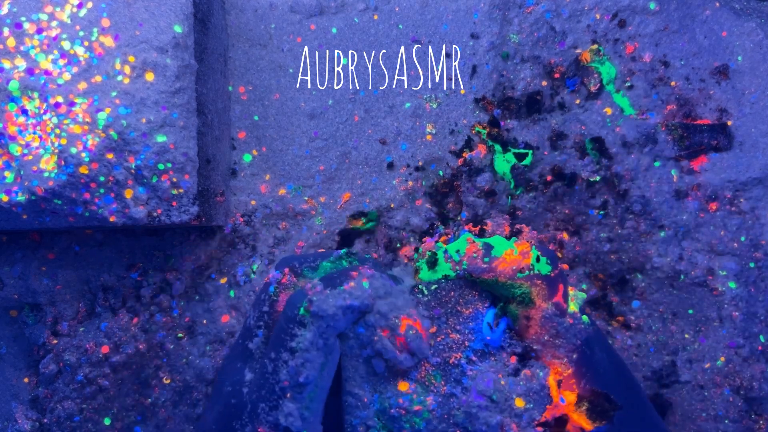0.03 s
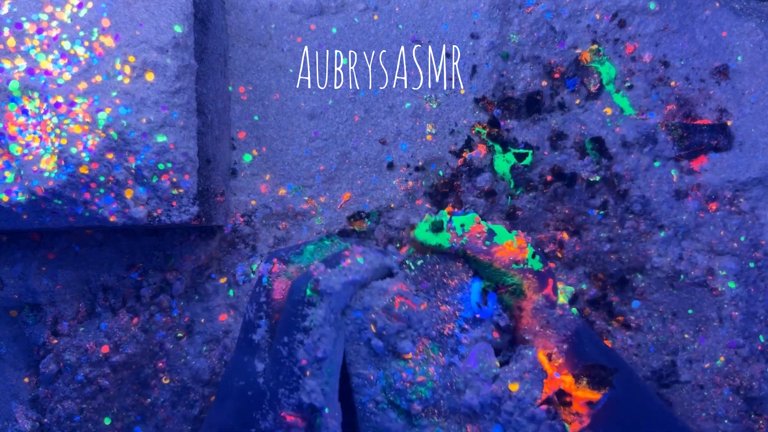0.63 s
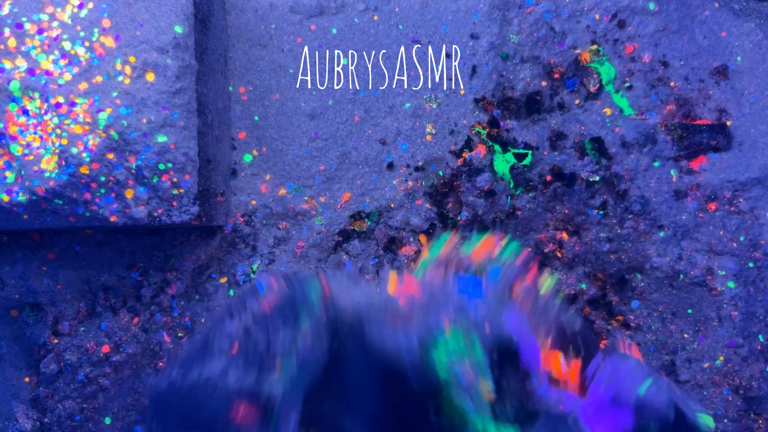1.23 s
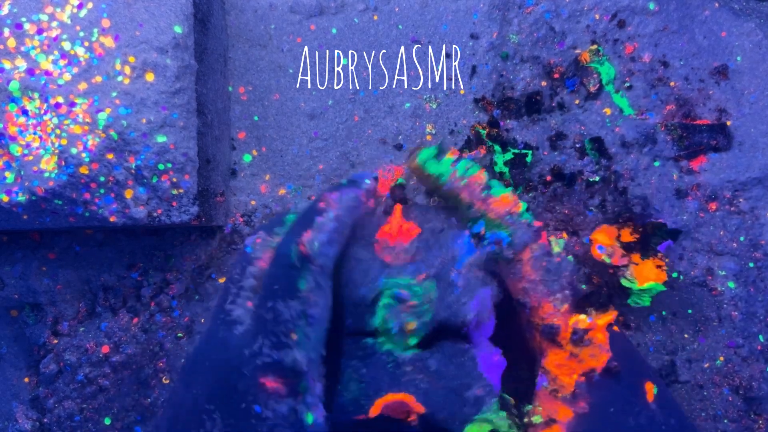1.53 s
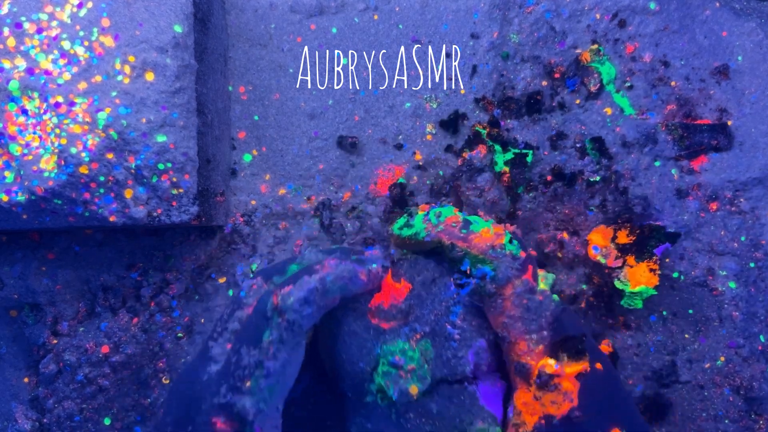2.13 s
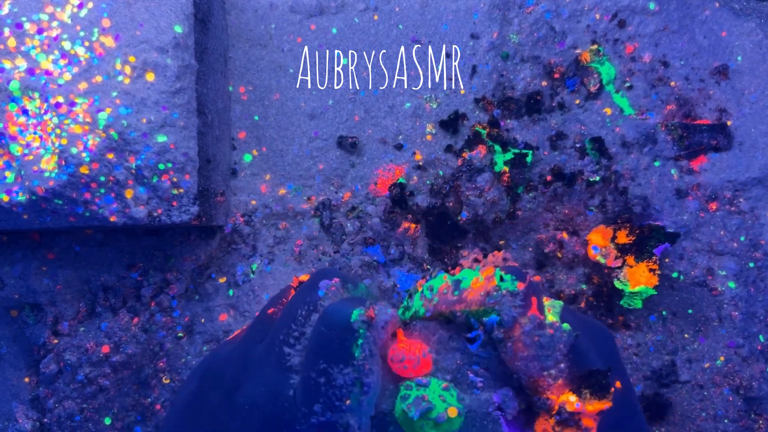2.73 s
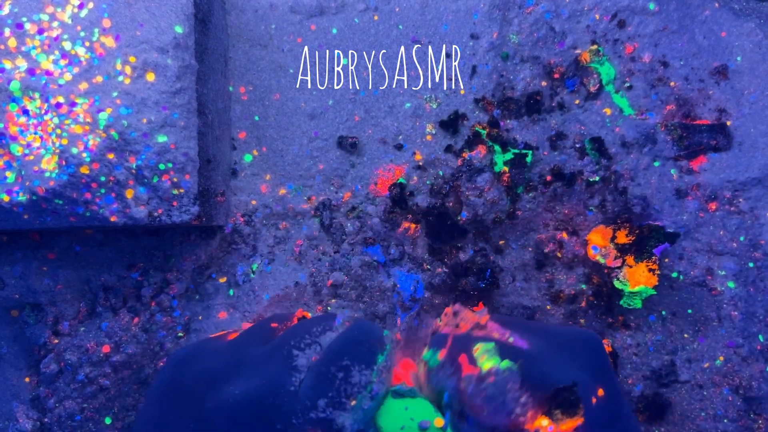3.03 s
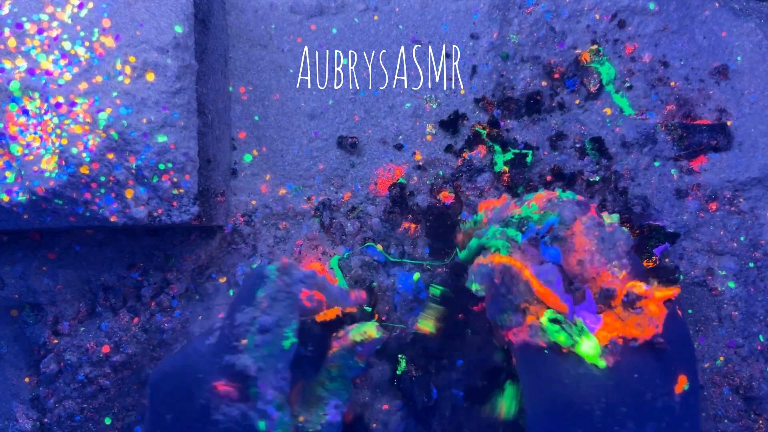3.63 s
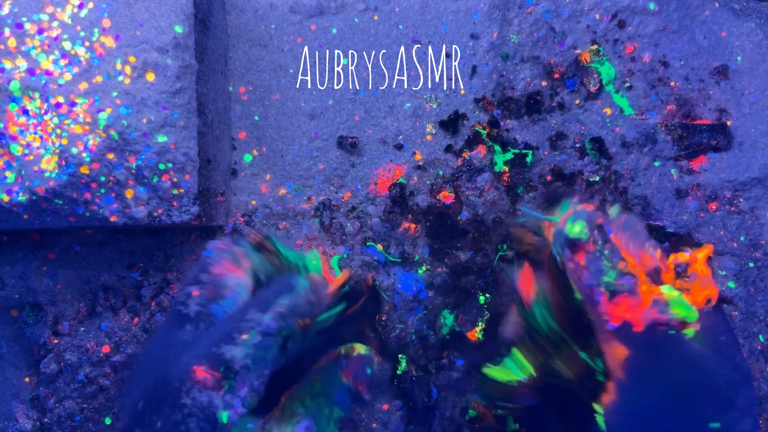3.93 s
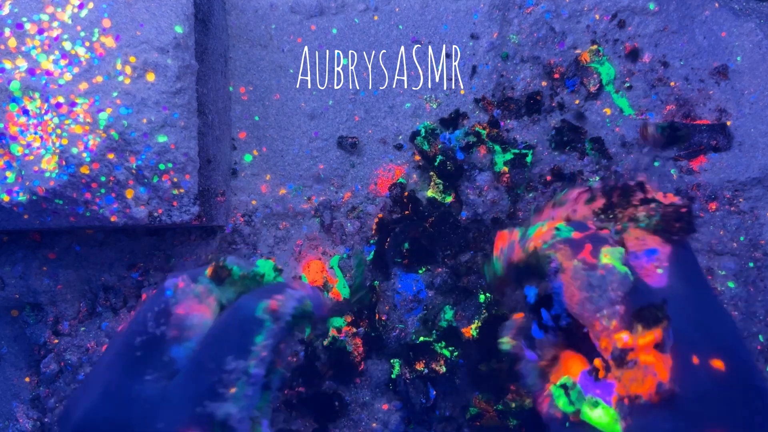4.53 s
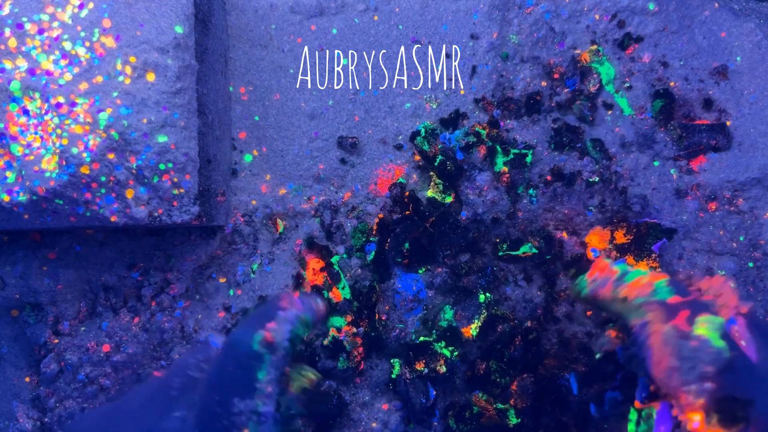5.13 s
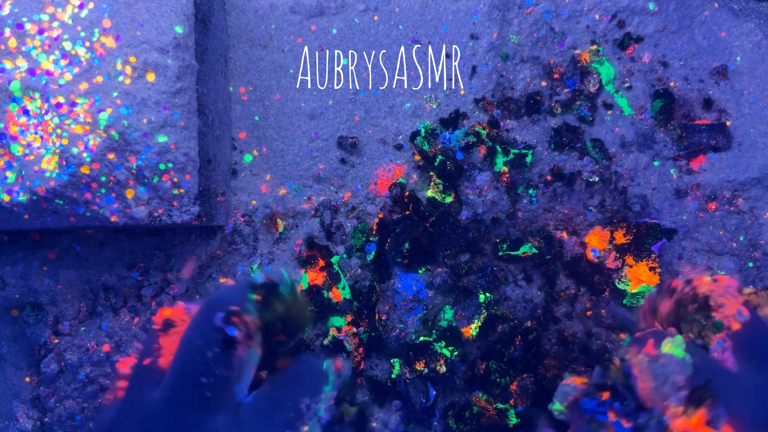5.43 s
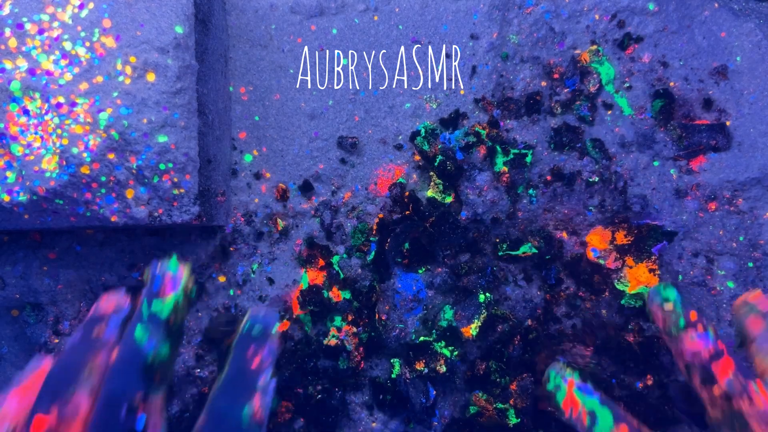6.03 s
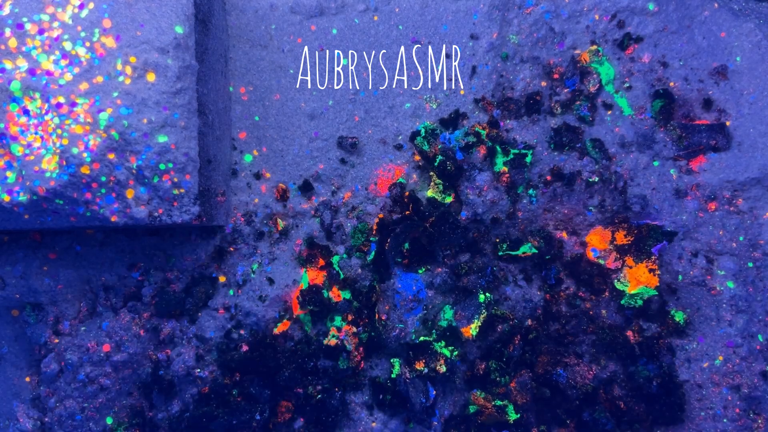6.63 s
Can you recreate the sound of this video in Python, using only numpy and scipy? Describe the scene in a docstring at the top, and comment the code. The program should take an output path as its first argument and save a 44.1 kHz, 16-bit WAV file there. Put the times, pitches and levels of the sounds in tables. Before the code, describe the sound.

Hands crush dry, brittle foam up close with crisp crunches and a soft table thud, then rub the powder in fading strokes.

```python
"""Hands crush a lump of dry floral foam over a table, close to a stereo microphone.
Countless tiny cell walls break in each squeeze, ringing in the cupped palms, and brittle flakes snap.
After a second the lump collapses: the hands thud on the table and hard bits knock against it.
More squeezes follow; from about 3.4 s the open hands rub the powder in softer and softer strokes.
Near 6 s they withdraw, leaving a few ticks and light bumps in a quiet room."""
import sys
import numpy as np
from scipy import signal
from scipy.fft import rfft, irfft, next_fast_len
from scipy.io import wavfile
from scipy.ndimage import uniform_filter1d

SR = 44100
rng = np.random.default_rng(int(sys.argv[2]) if len(sys.argv) > 2 else 0)


def dump(signal):
    """Clip the signal to [-1, 1] and save it as 16-bit WAV at the path in sys.argv[1]."""
    limited = np.clip(np.atleast_2d(signal).T, -1, 1)
    pcm = np.round(limited * 32767).astype(np.int16)
    wavfile.write(sys.argv[1], SR, pcm)


N = 303849
TIME = np.arange(N) / SR

# The brittle tone of a breaking flake. Each row: frequency in Hz, gain in dB.
FLAKE_EQ = [(100, -28.5), (400, -9.5), (750, -1.5), (2000, -1), (3400, 4), (6000, -3), (10000, 4.5),
            (12500, -16), (15500, -35.5)]
# The hollow ring between the palms: about 1580 Hz for a light grip, 890 Hz for a firm one (over -50 dB).
# Each row: effort in dB, mid-stroke pitch in Hz.
POCKET_PITCH = [(-41.5, 1580), (-50, 890)]


def crumbling(level_db=1.0, grit_db=-11.0, grit_growth=0.06, gaps_db=3.0, slips_db=2.0, ring_octaves=0.46):
    """Cell walls break in a dense stream; harder squeezing adds coarse grit, and the cupped hands ring."""
    # The dry tone of the foam. Each row: frequency in Hz, gain in dB.
    foam_eq = [(60, -19), (200, -13), (450, -11.5), (650, -3.5), (1150, -5), (1550, -2), (1770, -3.5),
               (2050, -1.5), (2400, -3.5), (3000, 0.5), (6000, -1), (9300, 2), (12000, -2), (15000, -20.5)]
    # Where the hollow body and the fine fizz act. Each row: frequency in Hz, signed weight on their dB.
    body_weights = [(200, 0.84), (600, 1), (1400, 0.96), (2800, 0)]
    fizz_weights = [(1500, -0.15), (3000, -2), (6000, -0.53), (10000, 0.91)]
    control_t = TIME[::128]
    effort_db, *tone = hands(control_t)
    effort_db = np.interp(TIME, control_t, effort_db)
    powder = unit(fractures(N, per_s=9000, spread_db=2.0))
    grit = unit(fractures(N, per_s=180, spread_db=3.5))
    stream = powder + grit * amp(grit_db + grit_growth * (effort_db - effort_db.mean()))
    hz, t, spectrum = signal.stft(unit(colour(stream, foam_eq)), SR, nperseg=512, noverlap=384)
    body_db, fizz_db, ring_db, pocket_hz = (np.interp(t, control_t, curve) for curve in tone)
    eq_db = np.outer(read(body_weights, hz), body_db) + np.outer(read(fizz_weights, hz), fizz_db)
    eq_db += ring_db * np.exp(-(np.log2((hz[:, None] + 1) / pocket_hz) / ring_octaves) ** 2)
    eq_db += gaps_db * patches(spectrum.shape, frames=26, bins=3)  # finger gaps open and shut
    eq_db += slips_db * patches((1, len(t)), frames=4, bins=1)  # the grip slips
    shaped = signal.istft(spectrum * amp(eq_db), SR, nperseg=512, noverlap=384)[1][:N]
    return shaped * amp(effort_db + level_db)


def hands(t, cupped_ring_db=7, open_ring_db=1):
    """All hand movements as one set of curves: their powers add, and the loudest leads the tone."""
    # Cupped hands squeeze the lump.
    # Each row: start, attack, hold and release in seconds, then effort, hollow body and fizz in dB.
    squeezes = [(-.026, 0.014, 0.031, 0.091, -33.5, -4.5, 0.8), (0.119, 0.081, 0.066, 0.17, -49, -2, -1.5),
                (0.321, 0.027, .012, 0.044, -49.5, -9, 2), (0.382, .049, 0.025, 0.035, -49.5, -1, -0.3),
                (0.471, 0.042, 0.17, 0.099, -46, -4, 0.5), (0.591, 0.052, 0.14, 0.11, -35.5, -3.5, 1.3),
                (.871, 0.05, 0.023, 0.097, -48, -8, 2), (0.957, 0.1, 0.0091, 0.069, -28, -3.5, -0.7),
                (1.686, 0.098, 0.12, 0.13, -52, -4, 1.5), (1.935, .097, 0.017, 0.15, -55, -1.5, 1),
                (2.121, 0.058, 0.0077, 0.047, -54.5, 7, -1), (2.156, 0.41, 0.28, 0.18, -38, -6.5, 3),
                (2.85, 0.046, .11, 0.12, -42, -3, 1), (3.084, .05, 0.04, .28, -55.5, -3.5, 0)]
    # Open hands rub off powder. Each row: as for a squeeze, without the fizz.
    rubs = [(3.39, 0.11, 0.11, 0.3, -41, -6.5), (3.883, 0.23, 0.096, 0.21, -45.5, -6),
            (4.298, 0.054, 0.1, 0.23, -58, -4.5), (4.471, 0.14, 0.034, 0.37, -49, -7.5),
            (4.941, 0.093, 0.2, .238, -52, -6.5), (5.436, 0.16, 0.19, 0.097, -54, -9.5)]
    # Dull scuffs on the table, and a spill of debris after the thud at 1.5 s.
    # Each row: start, hold and release in seconds, effort in dB.
    scuffs_and_spill = [(1.29, .05, 0.055, -57.5), (1.396, .03, 0.023, -61), (1.497, .005, .11, -52),
                        (6.655, 0.032, 0.091, -61)]
    # Loose powder trickles between strokes. Each row: time in seconds, level in dB.
    trickle = [(0, -60.5), (1.2, -55.5), (1.95, -62), (3.35, -74.5), (5.85, -72), (6.07, -80.5),
               (6.43, -69.5), (6.62, -77.5), (6.89, -69.5)]
    quick_attack_s, trickle_body_db, trickle_fizz_db = 0.0087, 6, 0.4
    moves = [stroke(t, *row, ring_db=cupped_ring_db) for row in squeezes]
    moves += [stroke(t, *row, fizz_db=0.84, ring_db=open_ring_db) for row in rubs]
    moves += [stroke(t, start, quick_attack_s, *row, body_db=8, fizz_db=-1, ring_db=open_ring_db)
              for start, *row in scuffs_and_spill]
    trickle_db = np.interp(t, *np.transpose(trickle))
    trickle_tone = trickle_body_db, trickle_fizz_db, open_ring_db, POCKET_PITCH[0][1]
    moves.append(np.broadcast_arrays(trickle_db, *trickle_tone))
    effort_db, *tone = np.swapaxes(moves, 0, 1)
    power = amp(effort_db) ** 2
    blended_tone = [np.average(curve, axis=0, weights=power) for curve in tone]
    return [10 * np.log10(power.sum(axis=0))] + blended_tone


def stroke(t, start, attack, hold, release, db, body_db, fizz_db, ring_db):
    """The palms close: the grip tightens, grains get finer, and the air pocket sinks and rings more."""
    tighten_db_per_s, finer_db, seal_db_per_s, sink_octaves_per_s = 7.5, 1.5, 12.5, 1
    since_middle = np.clip(t - start - attack - hold / 2, -attack - hold / 2, hold / 2 + release)
    grip_db = tighten_db_per_s * np.clip(since_middle, -hold / 2, hold / 2)
    effort_db = db + swell(t, start, attack, hold, release) + grip_db
    fizz_db = fizz_db + finer_db * since_middle / (attack + hold + release)
    ring_db = ring_db + seal_db_per_s * since_middle
    pocket_hz = np.interp(db, *np.transpose(POCKET_PITCH)) * 2 ** (-sink_octaves_per_s * since_middle)
    return np.broadcast_arrays(effort_db, body_db, fizz_db, ring_db, pocket_hz)


def crunches(per_s=3500, spread_db=3.0, tilt_db=0.17):
    """A patch of cells gives way at once, in an avalanche of fractures that dies away."""
    # Each row: start in seconds, peak level in dB, rough length in seconds.
    collapses = [(.004, -21.5, 0.014), (0.077, -24.5, 0.0072), (0.183, -28, 0.016), (0.652, -16, 0.044),
                 (0.711, -29, 0.0055), (0.723, -16.5, 0.01), (0.766, -22, 0.005), (0.776, -22, 0.028),
                 (1.064, -9, 0.017), (1.165, -33, 0.018), (1.534, -34, 0.0092), (2.417, -30, 0.0024),
                 (2.547, -27, 0.0051), (2.746, -18, 0.0096), (2.757, -15, 0.02), (2.8, -24.5, 0.0044),
                 (2.938, -21, 0.019), (3.135, -38, 0.021), (3.447, -33.5, 0.034), (3.559, -20, 0.017),
                 (3.577, -21, 0.015), (3.683, -29, 0.015), (4.378, -36.5, .012), (4.824, -40, 0.074),
                 (5.526, -46.5, 0.062)]
    out, t = np.zeros(N), TIME[:4096]
    for start, db, length in collapses:
        age = t / (length / 4)
        avalanche = fractures(len(t), per_s, spread_db) * age * np.exp(-age)
        add(out, start, peaked(colour(avalanche, FLAKE_EQ, tilt_db), db))
    return out


def snaps(level_db=2.5):
    """Single flakes of the crust break, each with one dry click."""
    # Each row: start in seconds, relative peak level in dB, treble tilt in dB per octave.
    flakes = [(0.7257, -19.5, -0.5), (0.759, -19.5, -3.5), (0.8605, -17, 0), (0.9104, -34, 13),
              (0.9173, -23.5, 3), (0.9358, -25.5, 3), (1.3658, -29.5, 1.5), (1.4111, -36, 10),
              (1.438, -34, 10), (1.473, -34, 5), (1.5105, -20, 8), (1.6198, -28.5, 3.5), (2.4534, -21, 4),
              (2.7914, -16, 1.5), (3.055, -25, 22), (5.865, -46, -1), (5.8912, -47.5, 11), (6.378, -54, 14),
              (6.4383, -44, -1), (6.51, -54, 18), (6.5622, -52, 7)]
    out, t = np.zeros(N), TIME[:2048]
    for start, db, tilt_db in flakes:
        click = colour(crack(t, debris=0.21, decay_s=0.0012), FLAKE_EQ, tilt_db)
        add(out, start, peaked(click, db + level_db))
    return out


def knocks(level_db=-1.0, tick_db=-2, depth_bias_db=6, split_hz=1500, detune=0.08):
    """Hard lumps strike the table and ring briefly; heavier ones favour their low modes."""
    # Each row: start in seconds, relative peak level in dB, depth (lean to the low modes) in dB.
    hits = [(1.0701, -15, -6), (1.336, -27.5, 2.5), (1.344, -38, 10.5), (1.371, -29.5, 4.5),
            (1.499, -24, 9), (1.511, -18.5, 6), (1.668, -22, -10.5), (1.701, -19.5, -8),
            (1.741, -30.5, -10), (1.794, -37.5, -4.5), (1.832, -41, -9), (1.907, -37, -16),
            (2.219, -38, -12), (2.237, -42, -8.5), (2.758, -27.5, 6), (3.567, -38, 21)]
    # The ring of a lump. Each row: frequency in Hz, level in dB, time to fade 60 dB in seconds.
    lump_modes = [(596, -3.5, 0.02), (820, -4, 0.0079), (1210, 0.5, 0.022), (1460, 7, 0.015),
                  (2050, -3.5, 0.019), (2930, 4, 0.0068), (3210, 8.5, .009), (3890, -1.5, 0.011),
                  (4890, -6, 0.028), (6040, -5, .01), (6320, -4, 0.015)]
    out, t = np.zeros(N), TIME[:4096]
    for start, db, depth_db in hits:
        ring = np.zeros(len(t))
        for hz, mode_db, t60 in lump_modes:
            weight_db = (depth_db + depth_bias_db) * np.tanh(2 * np.log(split_hz / hz))
            polarity = rng.choice([-1, 1])
            detuned_hz = hz * (1 + detune * rng.standard_normal())
            ring += polarity * amp(mode_db + weight_db) * dying(t, t60) * np.sin(2 * np.pi * detuned_hz * t)
        tick = colour(crack(t, debris=0.13, decay_s=0.0018), FLAKE_EQ)
        add(out, start, peaked(ring, db + level_db) + peaked(tick, db + tick_db))
    return out


def table_thuds():
    """The hands bump the table top and it rings low; a longer contact sounds duller."""
    # Each row: start in seconds, peak level in dB, contact time in seconds.
    bumps = [(1.069, -26, 0.0071), (1.076, -23, .011), (1.4999, -22, 0.0033), (6.671, -48.5, 0.0055),
             (6.691, -58, 0.0037), (6.859, -49.5, 0.0096)]
    # The table top. Each row: frequency in Hz, level in dB, time to fade 60 dB in seconds.
    table_modes = [(61, -15.5, 0.24), (95, -12, 0.11), (154.7, -0.5, 0.19), (194, -1, 0.11),
                   (221.3, -7, .24), (301, -12.5, 0.19), (373.4, -22.5, 0.11)]
    out, t = np.zeros(N), TIME[:SR // 2]
    ring = sum(amp(db) * dying(t, t60) * np.cos(2 * np.pi * hz * t) for hz, db, t60 in table_modes)
    for start, db, contact in bumps:
        push = np.sin(np.pi * np.minimum(t / contact, 1)) ** 2
        add(out, start, peaked(signal.fftconvolve(push, ring)[:len(t)], db))
    return out


def arm_rumble(attack_s=0.11, release_s=0.35, resting_db=-77.5):
    """Forearms shuffle on the table and keep it rumbling."""
    # Each row: start in seconds, hold in seconds, level in dB.
    shuffles = [(-.1, 0.8, -70.5), (1.006, 0.54, -55.5), (2.57, 0.41, -68), (3.46, 0.16, -65.5),
                (5.916, .85, -68.5)]
    # The dark tone of the rumble. Each row: frequency in Hz, gain in dB.
    rumble_eq = [(20, -14), (55, -2), (105, -2.5), (160, -7), (260, -17), (500, -20.5), (1500, -50),
                 (6000, -79)]
    rumble = unit(colour(rng.standard_normal(N), rumble_eq))
    moving = sum(amp(db + swell(TIME, start, attack_s, hold, release_s)) for start, hold, db in shuffles)
    return rumble * np.hypot(moving, amp(resting_db))


def stray_crumbs(level_db=-79, tilt_db=6):
    """Loose crumbs keep dropping and settling with tiny bright ticks."""
    ticks = fractures(N, per_s=22, spread_db=-0.5)
    return amp(level_db) * unit(colour(ticks, FLAKE_EQ, tilt_db))


def reflections(x, near_t60=0.044, room_t60=0.22, room_db=-20):
    """Quick echoes from the table and hands, then a faint room tail."""
    # Each row: frequency in Hz, echo level against the direct sound in dB.
    echo_eq = [(100, -17), (700, -9), (1350, -5), (2000, -14), (3400, -7), (5400, -6.5), (8300, -17),
               (10000, -14), (14000, -8)]
    t = TIME[:SR // 3]
    taps = rng.standard_normal(len(t)) * (dying(t, near_t60) + amp(room_db) * dying(t, room_t60))
    return colour(signal.fftconvolve(x, taps / np.linalg.norm(taps))[:N], echo_eq)


def in_room(x, front_db=-2):
    """Echoes from the front reach both channels alike; those from the sides arrive in opposite phase."""
    front = x + amp(front_db) * reflections(x)
    sides = reflections(x)
    return np.array([front + sides, front - sides])


def room_tone(level_db=-76):
    """Steady quiet air of the room."""
    # A low hush with faint hiss. Each row: frequency in Hz, gain in dB.
    air_eq = [(20, -4.5), (90, -3), (250, -1.5), (600, -18), (1500, -24), (4000, -29), (10000, -17.5),
              (15000, -21)]
    return amp(level_db) * unit(colour(rng.standard_normal(N), air_eq))


def fractures(count, per_s, spread_db):
    """Random clicks; a positive spread makes a few stand out above the many small ones."""
    size = amp(spread_db * np.minimum(rng.exponential(1, count), 5))
    return size * rng.choice([-1, 1], count) * (rng.random(count) < per_s / SR)


def crack(t, debris, decay_s):
    """One sharp break followed by a short spray of debris."""
    return (t == 0) + debris * rng.standard_normal(len(t)) * np.exp(-t / decay_s)


def swell(t, start, attack, hold, release, depth_db=21, curve=1.19):
    """Attack, hold and release of one movement, in dB relative to its top."""
    rising = np.maximum(1 - (t - start) / attack, 0)
    falling = np.maximum((t - start - attack - hold) / release, 0)
    return -depth_db * (rising ** curve + falling ** curve)


def dying(t, t60):
    """Gain of a ring that loses 60 dB in t60 seconds."""
    return np.exp(-np.log(1000) * t / t60)


def patches(shape, frames, bins):
    """Smooth random field over frequency and time."""
    field = rng.standard_normal(shape[::-1]).T
    return unit(uniform_filter1d(uniform_filter1d(field, bins, 0), frames, 1))


def colour(x, eq, tilt_db=0, size=4096):
    """Minimum-phase EQ, with a tilt per octave above about 1 kHz."""
    hz = abs(np.fft.fftfreq(size, 1 / SR))
    log_gain = np.log(amp(read(eq, hz) + tilt_db * np.log2(1 + hz / 1000)))
    taps = np.fft.ifft(np.exp(np.conj(signal.hilbert(log_gain)))).real
    return signal.fftconvolve(x, taps[:size // 2])[:len(x)]


def read(points, hz):
    """Reads a table on a log-frequency axis."""
    point_hz, value = np.transpose(points)
    return np.interp(np.log(hz + 1), np.log(point_hz + 1), value)


def amp(db):
    """Decibels to gain."""
    return 10 ** (np.asarray(db) / 20)


def unit(x):
    """Scales to rms 1."""
    return x / np.sqrt(np.mean(x ** 2) + 1e-20)


def peaked(x, db):
    """Scales to a peak level."""
    return amp(db) * x / (abs(x).max() + 1e-20)


def add(mix, start_s, sound):
    """Mixes a sound in at its start time."""
    part = mix[max(round(start_s * SR), 0):][:len(sound)]
    part += sound[:len(part)]


def scene(spots=3):
    """The foam crumbles at several spots at once, each with its own paths to the microphone."""
    foam = sum(in_room(crumbling()) for _ in range(spots)) / np.sqrt(spots)
    debris = in_room(crunches() + stray_crumbs())
    handling = in_room(snaps() + knocks() + table_thuds() + arm_rumble())
    return foam + debris + handling + room_tone()


def record(dry, low_cut_hz=45, high_cut_hz=15000):
    """The microphone's two sides differ in phase and level and lose the deepest bass and top treble."""
    # Each row: frequency in Hz, phase lead of the left side in radians.
    phase_lead = [(100, 0), (1100, .4), (1550, 1.8), (1850, 0), (3400, .9), (5000, .5), (6000, -.9),
                  (7000, -1.7), (8300, -3.14), (10000, -4.6), (11600, -6.2), (13000, -6.6), (15000, -9.4)]
    # Each row: frequency in Hz, level of left over right in dB.
    balance = [(200, .4), (950, .5), (1600, -.5), (2700, 1.8), (4200, 3.2), (6300, 2.2), (8300, 0),
               (15000, 0)]
    size = next_fast_len(N + SR // 10)
    hz = np.fft.rfftfreq(size, 1 / SR)
    left_gain = amp(read(balance, hz) / 2) * np.exp(0.5j * read(phase_lead, hz))
    pair = irfft(rfft(dry, size) * np.array([left_gain, 1 / left_gain]), size)[:, :N]
    pair = signal.sosfilt(signal.butter(4, low_cut_hz, "highpass", fs=SR, output="sos"), pair)
    lowpass = signal.firwin(255, high_cut_hz, window=("kaiser", 9), fs=SR)
    return signal.oaconvolve(pair, lowpass[None], "same")


dry = scene()
out = record(dry)
dump(out)
```